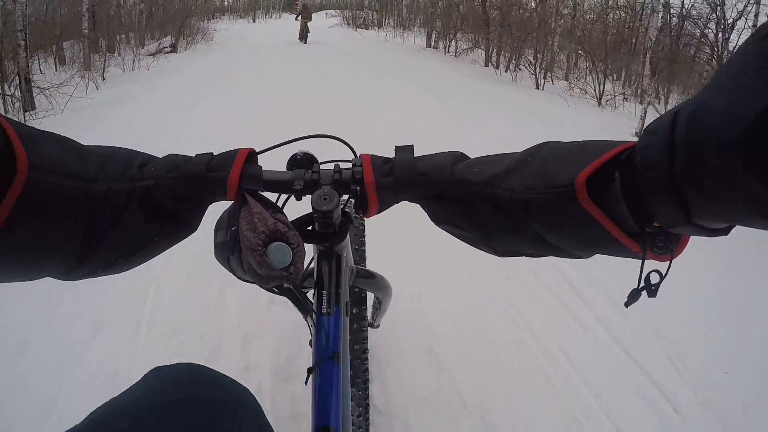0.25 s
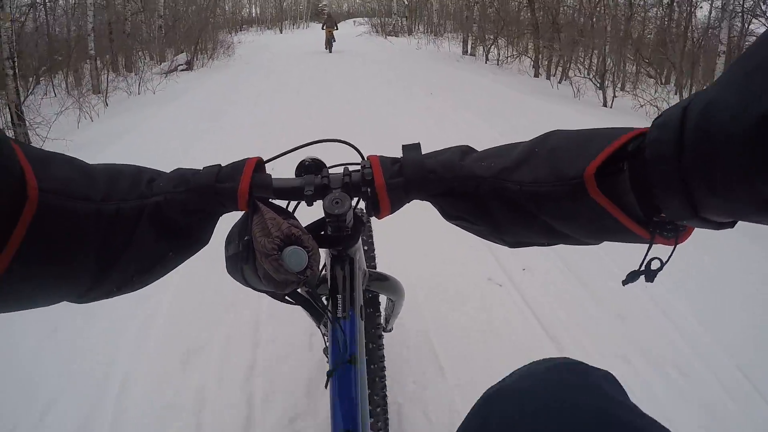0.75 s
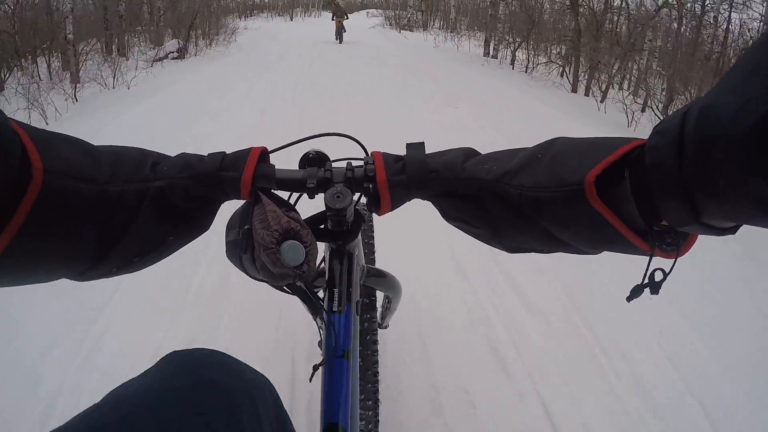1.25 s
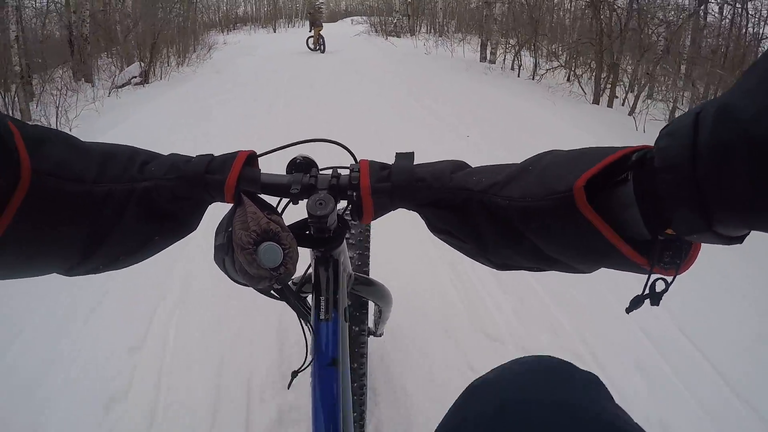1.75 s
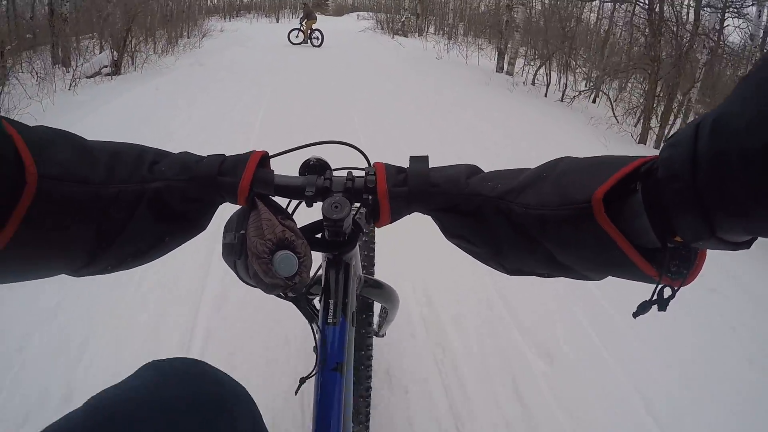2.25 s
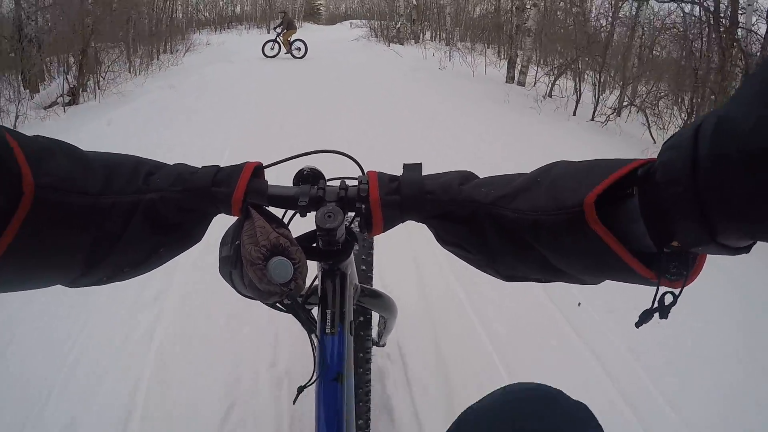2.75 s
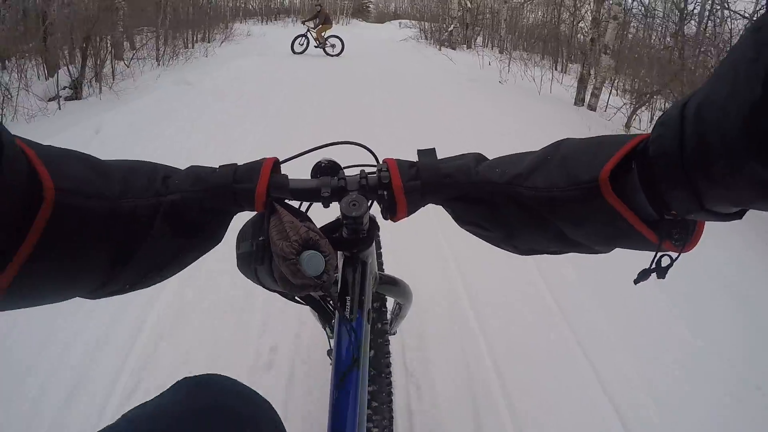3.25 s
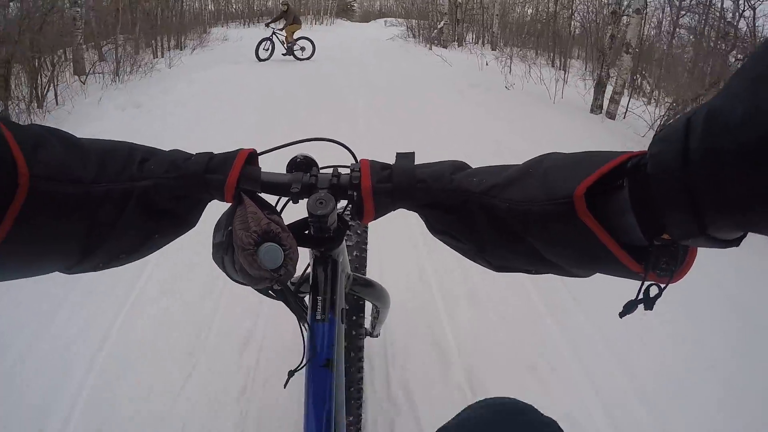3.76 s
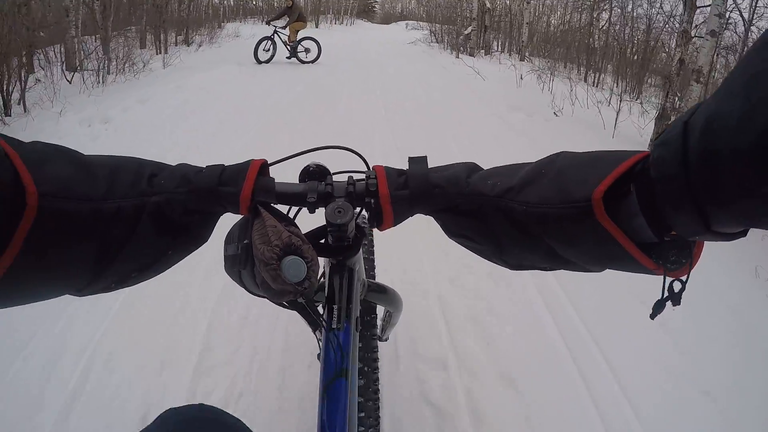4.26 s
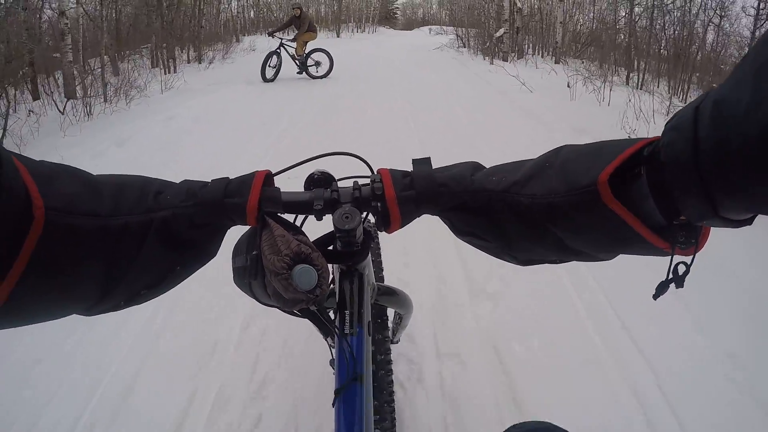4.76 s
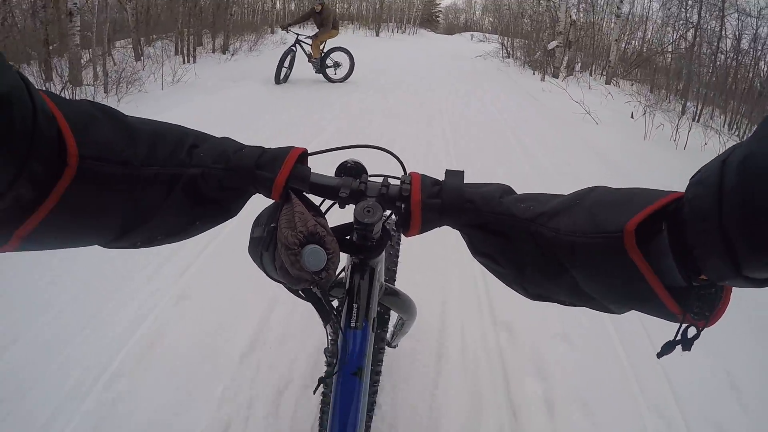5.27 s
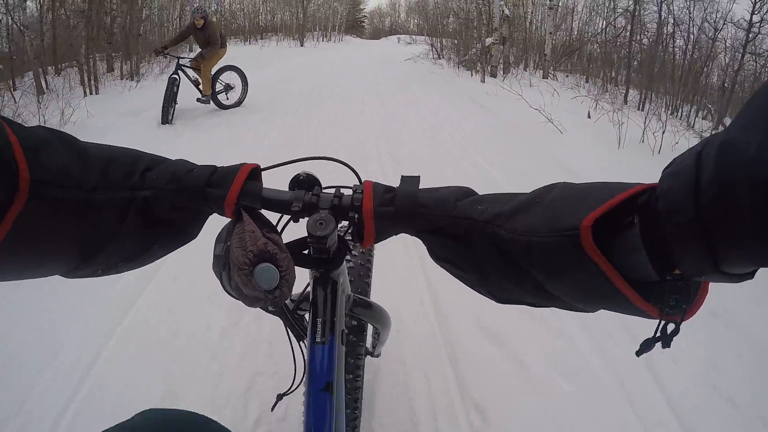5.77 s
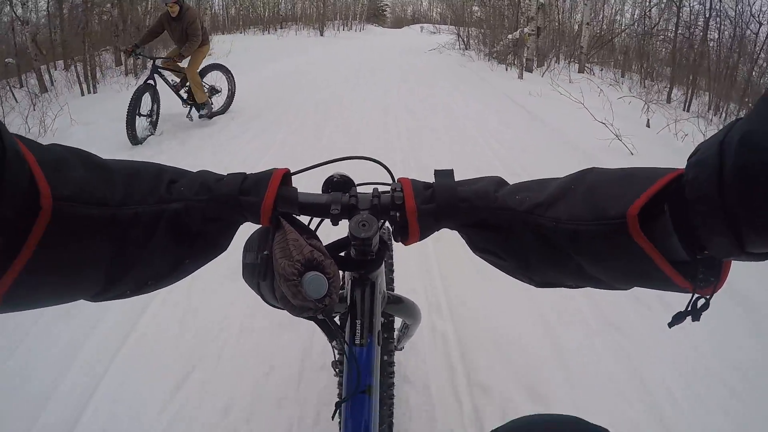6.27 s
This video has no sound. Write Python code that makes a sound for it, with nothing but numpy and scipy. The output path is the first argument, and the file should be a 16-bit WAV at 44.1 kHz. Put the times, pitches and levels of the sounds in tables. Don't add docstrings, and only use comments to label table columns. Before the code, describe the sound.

A wide-tyred bike rides on packed snow, heard from a sealed camera case on the rider's chest. Tyres growl and hiss steadily over low, muffled wind and rut rumble. Hard, dry clacks of the mount stand out far above it, loudest early on, with softer thuds between. Fabric rustles in short bursts, a strap creaks briefly near the middle, and a chain link ticks late. Open trail, no echo.

```python
import sys
import numpy as np
from scipy import signal
from scipy.fft import rfft, irfft
from scipy.io import wavfile
from scipy.ndimage import uniform_filter1d

SR = 44100
rng = np.random.default_rng(int(sys.argv[2]) if len(sys.argv) > 2 else 0)


def level_to_linear(level):
    exponent = np.asarray(level, float) / 20
    return 10 ** exponent


def unload_audio(sound):
    columns = np.transpose(np.atleast_2d(sound))
    steps = np.round(np.clip(columns, -1, 1) * 32767)
    wavfile.write(sys.argv[1], SR, steps.astype(np.int16))


N = 287532
T = np.arange(N) / SR


def unit(x):
    return x / np.sqrt(np.mean(x ** 2))


def walk(rate):
    hold = int(SR / rate)
    levels = np.repeat(rng.standard_normal(N // hold + 1), hold)[:N]
    return unit(uniform_filter1d(uniform_filter1d(levels, hold), hold))


def coloured(x, colour, lo_hz=1, hi_hz=SR):
    f = np.maximum(np.fft.rfftfreq(N, 1 / SR), 1)
    hz, db = np.transpose(colour)
    edges = 1 / np.sqrt((1 + (lo_hz / f) ** 10) * (1 + (f / hi_hz) ** 10))
    gain = level_to_linear(np.interp(np.log(f), np.log(hz), db))
    return irfft(rfft(x) * gain * edges, N)


def grains(per_s, spread_db):
    size = level_to_linear(spread_db * rng.exponential(size=N))
    hit = (rng.random(N) < per_s / SR) * size
    tail = signal.lfilter([1], [1, -.97], hit)
    return rng.standard_normal(N) * (1 + tail)


def bands(sources, curve, offset_db, follow, colour, edges_hz, shared_db, own_db, rate):
    db = np.interp(T, *np.transpose(curve))
    mean_db = db.mean()
    out, gust = 0, walk(rate)
    settings = zip(sources, edges_hz, edges_hz[1:], offset_db, follow, shared_db)
    for source, lo, hi, lift_db, share, depth_db in settings:
        mid = np.sqrt(lo * hi)
        halves = [coloured(source, colour, a, b) * level_to_linear(own_db * walk(rate))
                  for a, b in ((lo, mid), (mid, hi))]
        flickering = unit(sum(halves) * level_to_linear(depth_db * gust))
        out = out + flickering * level_to_linear(mean_db + lift_db + share * (db - mean_db))
    return out


def ring(modes, contact_ms, stretch, detune):
    t = np.arange(6144) / SR
    hz, db, t60, sign = np.transpose(modes)[:, :, None]
    decay = 1000. ** (-t / (t60 * stretch))
    y = np.sum(sign * level_to_linear(db) * np.sin(2 * np.pi * hz * detune * t) * decay, axis=0)
    push = np.exp(-.5 * ((t[:128] * 1000 - 1) / max(contact_ms, .02)) ** 2)
    y = np.convolve(y, push)[:len(t)]
    return y / np.abs(y).max()


def add(out, s, sound):
    i = max(int(s * SR), 0)
    out[i:i + len(sound)] += sound[:N - i]


# (frequency [Hz], level [dB], t60 [s], polarity)
HARNESS_MODES = [(105.8, -1.5, 0.087, -0.51), (161, -8, 0.048, 0.91), (252.5, -0.5, 0.047, -0.8),
                 (392, -10, 0.024, -1.3)]


def blows(table, modes, scatter, lead_s):
    out, chance = np.zeros(N), rng.standard_normal((len(table), len(modes), 1))
    harness = ring(HARNESS_MODES, 0.33, 0.95, 1)
    for (s, db, contact_ms, stretch, harness_db), c in zip(table, chance):
        add(out, s - lead_s, level_to_linear(db) * ring(modes, contact_ms, stretch, 1 + scatter * c))
        add(out, s - lead_s + 0.00304, level_to_linear(db + harness_db) * harness)
    return out


# (time [s], level [dB])
WIND_STRENGTH = [(0, -55), (.15, -53), (.35, -54.5), (.7, -53), (1.05, -51.5), (1.65, -52), (2.3, -51.5),
                 (2.7, -51.5), (3.1, -49.5), (3.45, -52.5), (3.75, -53.5), (4.3, -55.5), (4.52, -54.5),
                 (4.68, -57.5), (4.9, -53), (5.5, -49), (6.12, -50.5), (6.3, -53.5)]
WIND_BANDS = [10, 35, 100, 330]
# (frequency [Hz], density [dB per Hz])
WIND_SPECTRUM = [(8, -21.5), (16, 5.5), (30, -7), (60, -15), (110, -21), (200, -24), (330, -31)]


def wind(air):
    return bands([air] * 3, WIND_STRENGTH, offset_db=[8, 0.6, -6], follow=[0.26, 0.78, 1],
                 colour=WIND_SPECTRUM, edges_hz=WIND_BANDS, shared_db=[.8, 2.8, 3.2], own_db=0.93, rate=19.)


# (time [s], level [dB])
TYRE_LOAD = [(0.0, -59), (0.07, -60.5), (0.85, -57), (1.2, -59.5), (1.61, -60), (2.0, -60), (3.1, -57),
             (3.65, -55.5), (3.87, -57.5), (4.28, -58.5), (4.49, -60.5), (4.81, -60), (5.28, -57),
             (6.52, -58.5)]
TYRE_BANDS = [330, 1200, 3600, 15600]
# (frequency [Hz], density [dB per Hz])
TYRE_SPECTRUM = [(300, 3), (700, -7), (1150, -13.5), (1450, -5.5), (1900, -2), (2200, -7), (3050, -9),
                 (3400, -20.5), (4400, -18.5), (6300, -24.5), (7100, -30.5), (11000, -31.5), (13300, -29.5),
                 (15500, -32.5)]


def tyres(snow, air):
    return bands([snow, snow, air], TYRE_LOAD, offset_db=[-4.5, -0.5, -6], follow=[0.39, 1.05, 0.093],
                 colour=TYRE_SPECTRUM, edges_hz=TYRE_BANDS, shared_db=[1.5, .8, .2], own_db=0.738, rate=18.)


# (frequency [Hz], rms level [dB])
WHINE_TONES = [(11688, -98), (12228, -98), (13667, -96)]


def whine():
    return sum(np.sqrt(2) * level_to_linear(db) * np.sin(2 * np.pi * hz * T) for hz, db in WHINE_TONES)


# (time [s], level [dB], treble [dB], rise [s], t60 [s])
FABRIC_SLIPS = [(.0, -53.5, -5, 0.035, 0.41), (0.135, -52.5, 3, .001, 0.28), (0.31, -48, 3.5, 0.0081, 0.21),
                (.33, -54, -8, .008, .12), (.35, -50, -6, .008, .12), (.377, -50, -12, .006, 0.13),
                (2.19, -45, -0.5, 0.0037, 0.26), (2.228, -58, -4, 0.0036, .15),
                (2.266, -51.5, -5, .004, 0.31), (2.29, -59, -10, 0.0071, .2),
                (2.713, -51.5, -19, .002, 0.34), (3.31, -49.5, -3, 0.0071, 0.18),
                (3.34, -52, -18, 0.02, 0.17), (3.941, -57, 3, .002, 0.23),
                (4.067, -44.5, -2.5, 0.028, 0.156), (4.145, -48.5, -3, 0.033, .1),
                (4.295, -55.5, 1, 0.0046, 0.17), (4.315, -51.5, -1, 0.024, .1), (5.455, -58, -7, .003, .1),
                (5.79, -66, 3, 0.039, 0.69)]
# (frequency [Hz], density [dB per Hz])
CLOTH_SPECTRUM = [(530, -24), (900, -15), (1880, -7), (2030, -7), (2460, -1.5), (3980, -9), (4350, -3.5),
                  (4810, -19.5), (6880, -29.5), (7690, -25), (13000, -33.5)]


def jacket():
    t, body, treble = T[:SR // 2], np.zeros(N), np.zeros(N)
    for s, db, treble_db, rise, t60 in FABRIC_SLIPS:
        decay = 1000. ** (-np.maximum(t - rise, 0) / t60)
        swell = level_to_linear(db) * np.minimum(t / rise, 1) * decay
        add(body, s, swell)
        add(treble, s, swell * level_to_linear(treble_db))
    cloth = unit(coloured(grains(per_s=900, spread_db=1.2), CLOTH_SPECTRUM))
    highpass = signal.butter(3, 3200, "high", fs=SR, output="sos")
    bright = signal.sosfiltfilt(highpass, cloth)
    return (body * (cloth - bright) + treble * bright) * level_to_linear(1.2 * walk(90))


# (time [s], peak level [dB], ring stretch [x], harness below peak [dB])
CHEST_BUMPS = [(.019, -41, 0.64, -7), (.249, -45.5, 1.1, -10), (.56, -52, 1.01, -4), (.621, -46, 0.72, -4),
               (.704, -49, .86, -1), (.845, -37, 0.86, -13), (1.061, -48, 1.07, -8), (1.372, -50, 0.91, -8),
               (1.992, -44.5, 1.2, -10), (2.463, -43.5, 1.3, -7), (2.527, -47, 1.3, -10),
               (2.731, -46.5, 1.1, -4), (2.968, -47, 1.1, -19), (3.096, -49, 1.4, -9),
               (3.225, -38.5, 0.6, -9), (3.355, -46, 1.1, -17), (3.389, -37.5, 1.3, -9),
               (3.474, -33, 1, -7), (3.578, -43.5, 1.3, -8), (3.857, -47.5, 1.2, 3), (3.944, -40, 1.2, -3),
               (4.39, -33.5, 1.4, -9), (4.567, -43, 1.3, -4.5), (4.849, -30.5, 0.74, -17),
               (0.4128, -34.5, .8, -15), (1.4232, -38.5, 0.94, -15), (4.944, -49.5, 1.01, -6),
               (5.269, -31.5, .68, -10), (5.385, -41.5, 0.92, -19), (5.775, -42, 1.1, -1),
               (6.114, -42.5, 1.01, -18), (6.175, -37.5, 1, -4.5)]
# (frequency [Hz], level [dB], t60 [s], polarity)
PLATE_MODES = [(546, -2, 0.045, 0.73), (800, 1.5, 0.024, -0.95), (1013, -9, .014, 1),
               (1544, -1, 0.018, -1.1), (1920, -2.5, 0.011, 0.81)]


def bumps():
    contact_ms = 0.064
    table = [(s, db, contact_ms, stretch, harness_db) for s, db, stretch, harness_db in CHEST_BUMPS]
    return blows(table, PLATE_MODES, scatter=0.088, lead_s=0.00109)


# (time [s], peak level [dB], low edge [Hz], high edge [Hz], t60 [s])
SMALL_TICKS = [(.136, -43, 1500, 5000, .014), (.243, -42, 1220, 2590, .015), (.3058, -37, 1100, 5200, .013),
               (.4058, -37, 1500, 12000, .012), (.719, -44, 1200, 2000, .015), (.74, -46, 1000, 2500, .015),
               (1.642, -49, 1400, 2400, .013), (2.1918, -43, 2700, 4700, .012),
               (2.1988, -41, 2000, 3000, .02), (2.2666, -41, 2600, 6000, .012),
               (2.281, -44, 1500, 2100, .02), (2.612, -46, 1500, 2200, .02), (2.714, -44, 1300, 4500, .011),
               (2.8706, -48, 4600, 7200, .008), (3.013, -57, 2000, 3800, .012),
               (3.097, -41, 1200, 4200, .012), (3.175, -37, 2600, 3950, .0057),
               (3.175, -44.5, 4700, 16000, .013), (3.1755, -43, 1500, 2300, .01),
               (3.941, -46, 2800, 4970, .015), (4.088, -41, 2100, 2800, .02), (4.178, -43, 2100, 2900, .01),
               (4.223, -48, 1300, 6500, .01), (4.346, -40.5, 3900, 15300, .018),
               (4.559, -48, 1200, 2500, .013), (5.186, -42, 4000, 15500, .017),
               (6.143, -40, 3980, 15300, .021), (6.222, -44, 3170, 5200, .011),
               (6.359, -40, 1450, 2150, .03), (6.3735, -46, 1350, 1900, .02),
               (6.384, -42, 1450, 2300, .009)]


def ticks():
    out, t = np.zeros(N), np.arange(2048) / SR
    noises = rng.standard_normal((len(SMALL_TICKS), len(t)))
    for (s, db, low_hz, high_hz, t60), noise in zip(SMALL_TICKS, noises):
        band = signal.butter(4, [low_hz, high_hz], "bandpass", fs=SR, output="sos")
        dull = signal.lfilter([1], [1, -.7], noise)
        envelope = 1000. ** (-t / t60) * np.minimum(t / 0.0013, 1)
        burst = signal.sosfilt(band, dull * envelope)
        add(out, s - .001, level_to_linear(db) * burst / np.abs(burst).max())
    return out


# (time [s], peak level [dB], pitch [Hz])
RUT_LURCHES = [(.28, -34, 41), (0.449, -29.5, 15.8), (.81, -35, 43), (.91, -41.5, 83), (1.12, -25.5, 20.6),
               (1.48, -33, 21), (1.7, -38.5, 60), (1.831, -34, 16.6), (1.92, -33.5, 19.4),
               (2.228, -32.5, 23), (2.528, -31.5, 25), (2.92, -33, 19), (3.41, -42, 140),
               (3.48, -46.5, 167), (3.53, -32.5, 18.4), (3.61, -33.5, 65), (5.278, -39, 45),
               (4.099, -32.5, 24), (4.13, -47, 110), (4.562, -32.5, 24), (4.55, -48, 155), (4.93, -38, 66),
               (4.95, -34.5, 28), (5.28, -42, 110), (5.48, -39, 54), (5.46, -41.5, 120), (5.91, -46, 82),
               (6.07, -37, 36), (6.18, -35, 25), (6.411, -39, 59), (.63, -43, 72), (1.2, -56, 240),
               (1.66, -50.5, 200), (2.221, -51, 127), (3.87, -47, 60), (4.17, -48, 170), (4.79, -48, 165),
               (5.05, -50, 110), (5.26, -46.5, 150), (6.42, -49, 164), (5.78, -48, 170), (5.93, -48, 214),
               (.85, -42.5, 130), (4.5, -51, 195)]


def lurches():
    out, t = np.zeros(N), T[:SR // 2] - 1 / 4
    for (s, db, hz), turn in zip(RUT_LURCHES, rng.random((len(RUT_LURCHES), 1))):
        cycles = 0.52 * (hz / 25) ** 0.53
        swing = np.sin(2 * np.pi * (hz * t + turn))
        add(out, s - 1 / 4, level_to_linear(db) * swing * np.exp(-.5 * (t * hz / cycles) ** 2))
    return out


# (time [s], peak level [dB], contact [ms], ring stretch [x], harness below peak [dB])
MOUNT_KNOCKS = [(.416, 0.67, 0.025, 1.01, -23), (.8577, -8, 0.042, 0.93, -21),
                (1.4257, -2, 0.021, 1.01, -22), (1.8854, -10.5, 0.043, 0.91, -20),
                (2.8714, -15, 0.027, 0.96, -24), (2.9038, -23.5, .11, 0.94, -16),
                (3.751, -26.5, .07, 0.95, -23), (3.8049, -25, 0.054, 1.06, -29),
                (4.3963, -7, 0.056, 0.97, -22), (4.8564, -5.5, 0.036, 0.95, -21.5),
                (5.2806, -21.5, 0.09, 0.99, -22)]
# (frequency [Hz], level [dB], t60 [s], polarity)
CASE_MODES = [(853, -28.5, .013, 1), (1071, -15.5, .0041, 1), (1423, 4.6, .0038, -1), (1461, 2.6, .0053, 1),
              (1849, -14.6, .0087, -1), (1875, -47, .08, -1), (1195, -46, .038, -1), (2147, -5.9, .0022, 1),
              (2237, -21, .0133, -1), (2630, -31.8, .0071, -1), (3028, -36.5, .0137, -1),
              (3436, -31.5, .0107, -1), (4093, -34.4, .0045, -1), (4350, -42, .0095, 1),
              (5030, -53, .0086, -1), (6250, -41, .0041, -1)]


def knocks():
    return blows(MOUNT_KNOCKS, CASE_MODES, scatter=0.0019, lead_s=0.001233)


# (time [s], peak level [dB], contact [ms], ring stretch [x], harness below peak [dB])
EDGE_GLANCES = [
    (1.853, -23.5, 0.051, 1.1, -18),
    (1.8737, -37, .05, .9, -22),
    (2.8735, -25.5, 0.023, 0.79, -15),
    (2.877, -25.5, 0.087, 1.2, -18),
    (2.8795, -31, 0.079, 1.6, -28),
    (2.885, -38, .08, 1.01, -25),
    (2.8873, -28, 0.059, 0.66, -4.5),
    (3.8072, -36, 0.057, 2.1, -25),
    (3.8092, -32, 0.14, 1.1, -25),
]
# (frequency [Hz], level [dB], t60 [s], polarity)
EDGE_MODES = [(800, -10, 0.014, 0.91), (1310, -3.5, 0.01, -0.91), (1540, -0.5, 0.01, 1),
              (1770, -13, 0.0088, -0.85), (2380, -12.5, 0.015, -0.99), (2769, -15, 0.015, 0.91),
              (3300, -9, 0.0074, -1.14), (4500, -24, 0.013, 0.92)]


def glances():
    return blows(EDGE_GLANCES, EDGE_MODES, scatter=.03, lead_s=0.00143)


# (time [s], slip rate [Hz], level [dB])
STRAP_CREAK = [
    (3.06, 164.9, -61),
    (3.086, 163.2, -53),
    (3.098, 165.2, -51),
    (3.12, 158.4, -49),
    (3.162, 166, -51),
    (3.174, 163, -51),
    (3.185, 157, -54),
]
# (frequency [Hz], level [dB])
BUCKLE_SPECTRUM = [(400, -16), (1150, -21), (1450, -6), (1620, 5), (1950, -10), (2400, -14), (2950, -6),
                   (3350, -24)]


def strap():
    fade_s, lift_db = .012, -2.5
    s, rate, db = np.transpose(STRAP_CREAK)
    uneven_hz = np.interp(T, s, rate) * (1 + .008 * walk(150))
    phase = 2 * np.pi * np.cumsum(uneven_hz) / SR
    pulses = sum(np.cos(k * phase) for k in range(2, 24))
    slips = unit(coloured(pulses, BUCKLE_SPECTRUM))
    gate = np.clip(np.minimum(T - s[0], s[-1] - T) / fade_s + 1, 0, 1)
    return slips * gate * level_to_linear(np.interp(T, s, db) + lift_db + 2.5 * walk(160))


# (time [s], peak level [dB])
CHAIN_TICKS = [
    (4.347, -39),
    (5.187, -37),
    (6.144, -37),
]
# (frequency [Hz], level [dB], t60 [s], polarity)
LINK_MODES = [(2100, -7, .012, 0.93), (4370, 1, 0.014, 1), (6060, 0.5, 0.013, -0.92), (6860, -4, .012, 1),
              (11300, -2, .011, -1), (13300, -8, .011, 1)]


def chain():
    out = np.zeros(N)
    chance = rng.standard_normal((len(CHAIN_TICKS), len(LINK_MODES), 1))
    for (s, db), c in zip(CHAIN_TICKS, chance):
        add(out, s - .001, level_to_linear(db) * ring(LINK_MODES, .02, 1, 1 + .015 * c))
    return out


def scene():
    air = rng.standard_normal(N)
    snow = grains(per_s=400, spread_db=1.1)
    lowpass = signal.ellip(8, .2, 40, 15330, fs=SR, output="sos")
    bright = signal.sosfilt(lowpass, tyres(snow, air) + whine() + jacket() + ticks())
    mount = bumps() + knocks() + glances()
    return (wind(air) + bright + mount + lurches() + strap() + chain())[None]


def low_pass(x):
    return signal.sosfilt(signal.butter(12, 16290, fs=SR, output="sos"), x)


def record(dry):
    ceiling, knee = .93, 10
    mix = dry / (1 + np.abs(dry / ceiling) ** knee) ** (1 / knee)
    return low_pass(mix)


dry = scene()
out = record(dry)
unload_audio(out)
```